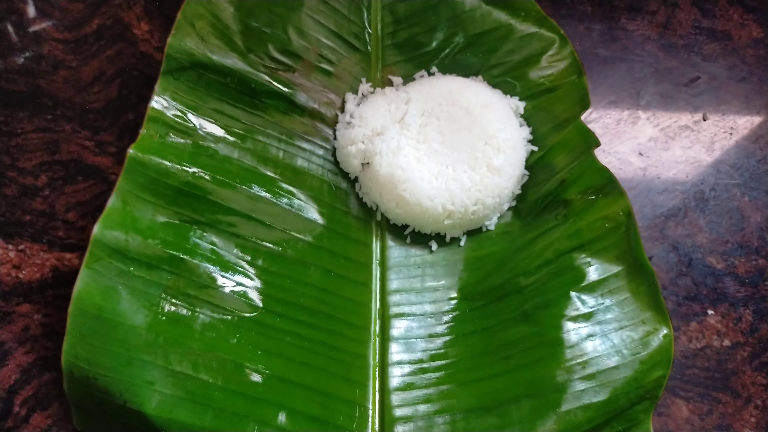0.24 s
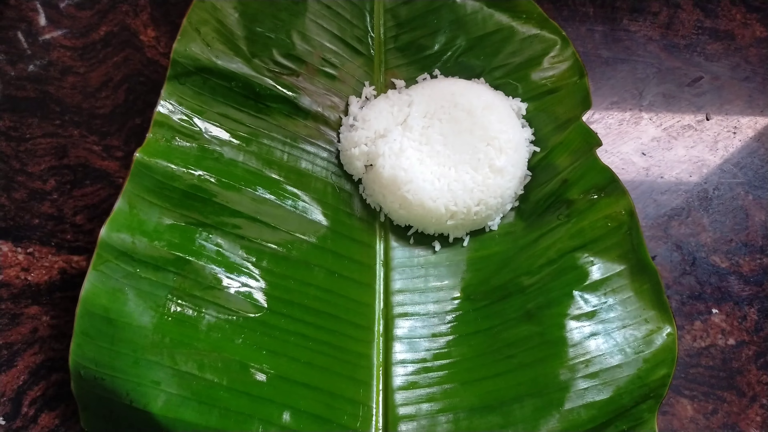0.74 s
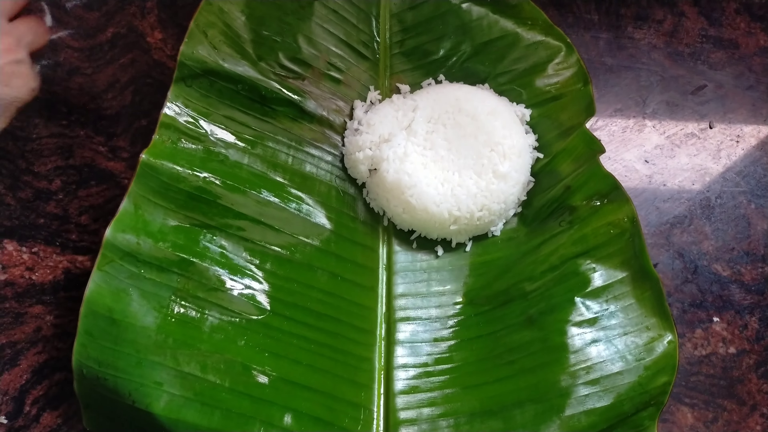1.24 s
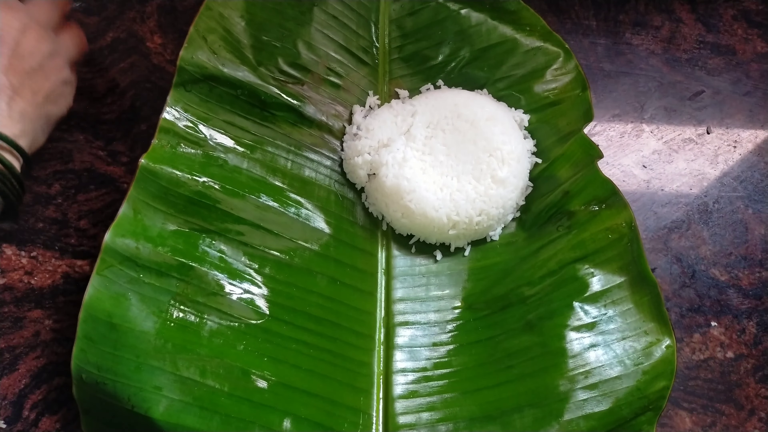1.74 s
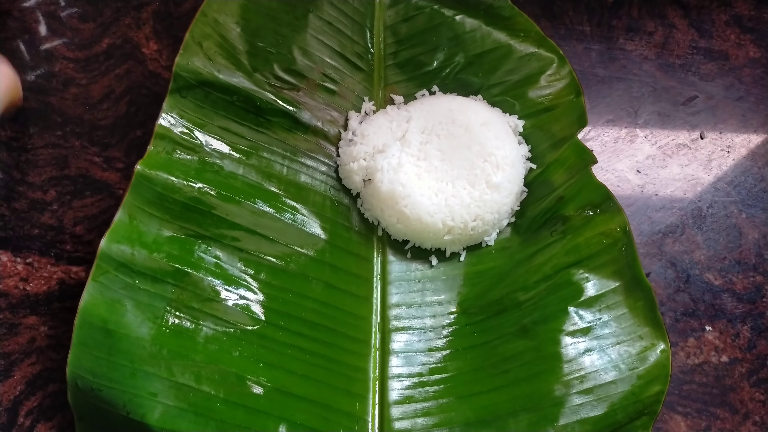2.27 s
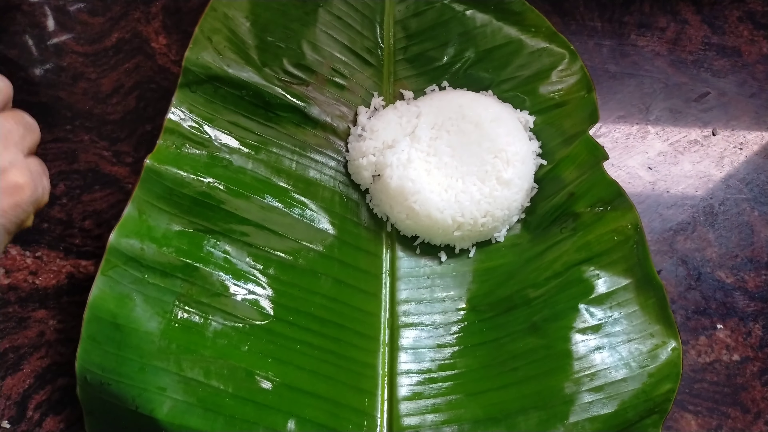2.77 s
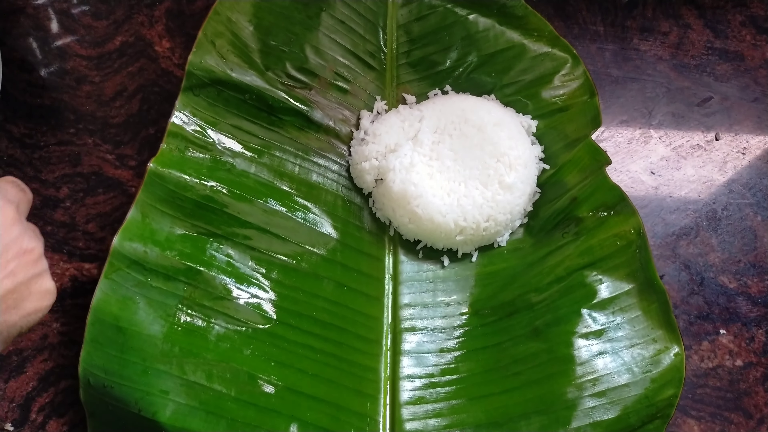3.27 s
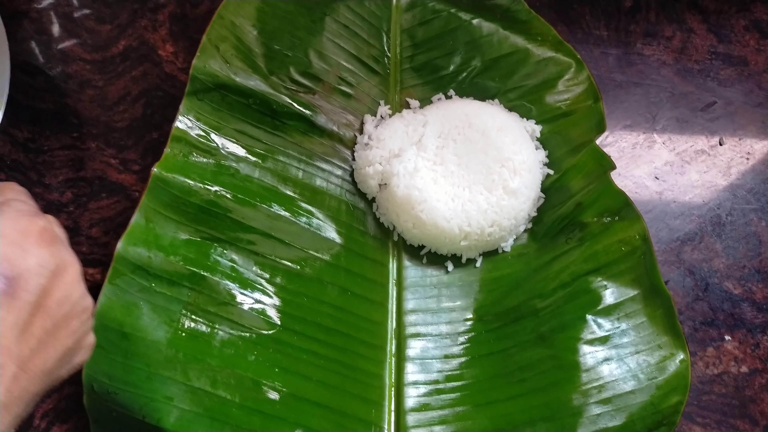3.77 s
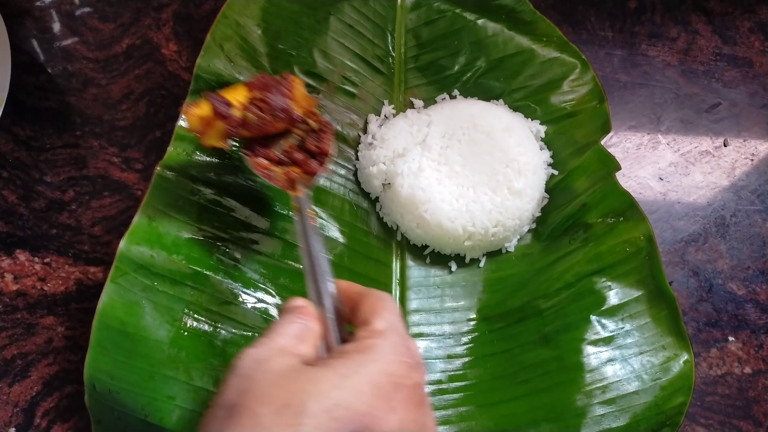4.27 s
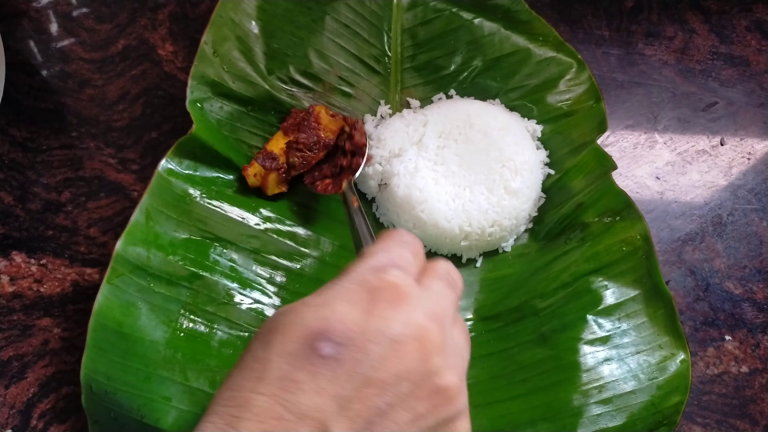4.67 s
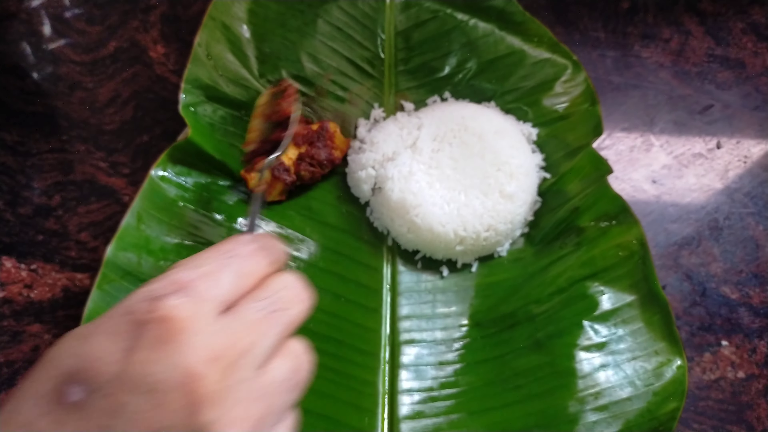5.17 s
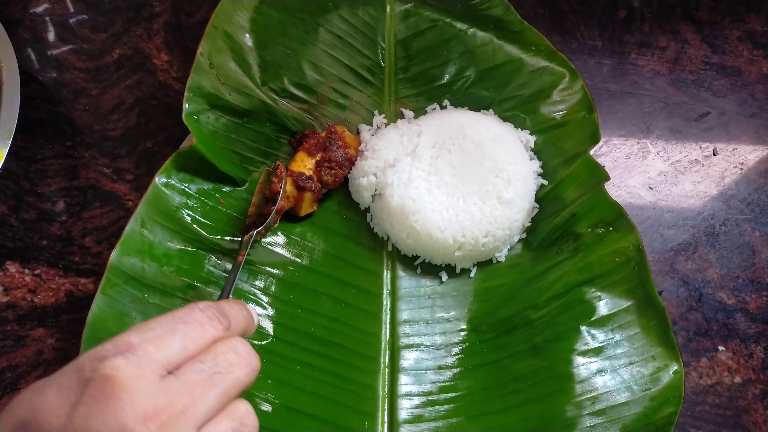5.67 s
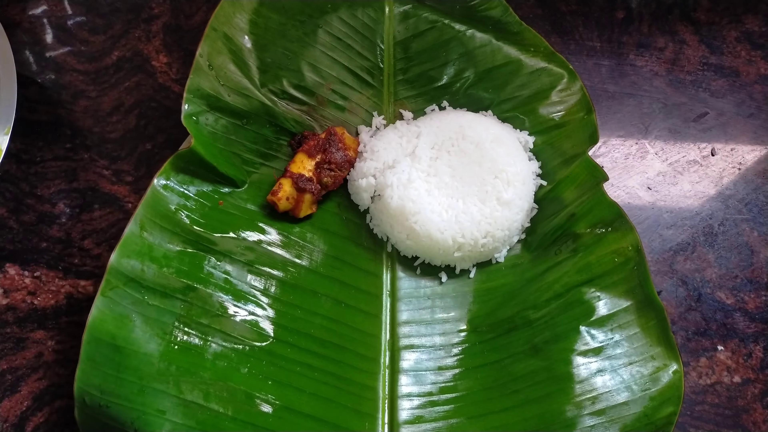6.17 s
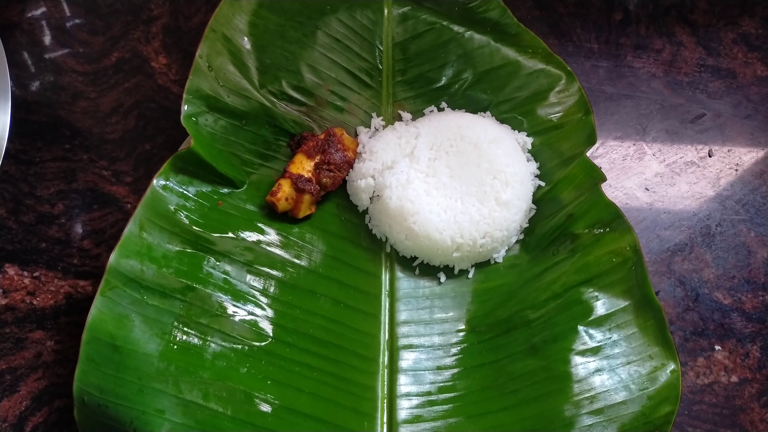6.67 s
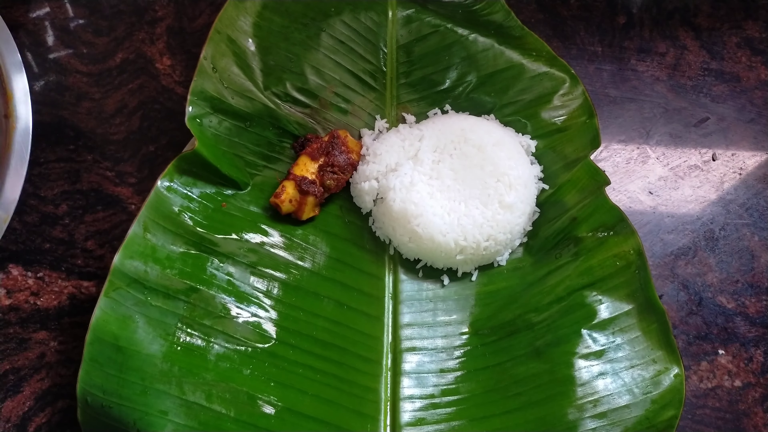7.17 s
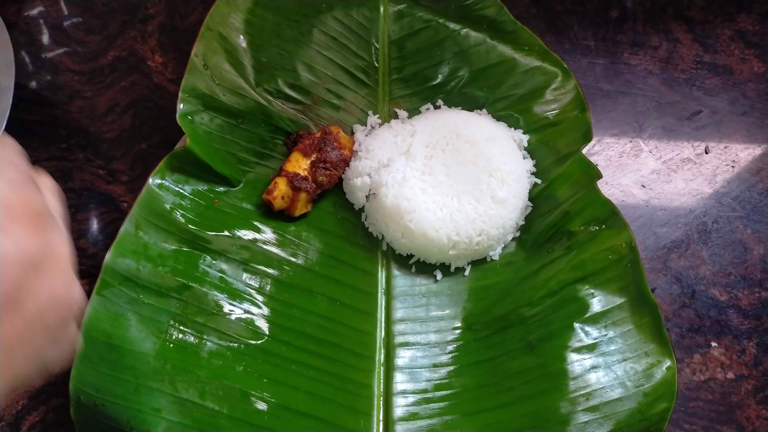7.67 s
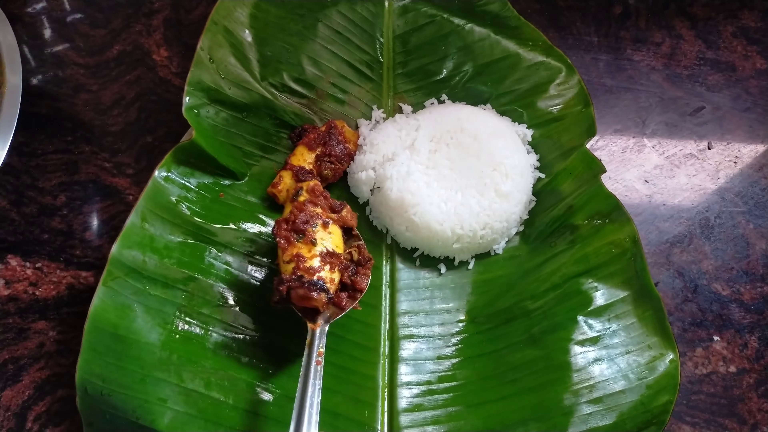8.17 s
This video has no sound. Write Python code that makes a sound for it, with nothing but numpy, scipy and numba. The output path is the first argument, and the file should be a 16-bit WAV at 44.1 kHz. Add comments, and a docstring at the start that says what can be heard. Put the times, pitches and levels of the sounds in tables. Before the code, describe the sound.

Loud metallic cup rattle on a stone top, followed by quieter lid, spoon, pan and bowl clinks, soft leaf brushing and faintly humming kitchen air.

```python
"""Serving food in a home kitchen, a phone close by. Soft brushing starts; a steel cup is set down on stone,
rocks to rest, and bangles tinkle; a lid is dragged aside; a steel spoon taps, then lands on a full steel pan;
a bowl is nudged along. Modal resonance: blows and gritty sliding excite each object's damped modes and clatter.
Shaped noise makes the ticks, the brushing, the small hard room's decay and the steady, faintly humming air."""
import sys
import numpy as np
from scipy import signal
from scipy.fft import rfft, irfft, next_fast_len
from scipy.io import wavfile
from scipy.ndimage import uniform_filter1d
from numba import njit

SR = 44100
rng = np.random.default_rng(int(sys.argv[2]) if len(sys.argv) > 2 else 0)


def pcm_store(signal):
    """Save signal as 16-bit PCM."""
    levels = np.round(np.clip(np.atleast_2d(signal), -1, 1) * 32767)
    wavfile.write(sys.argv[1], SR, levels.astype(np.int16).T)


N = 371983
T = np.arange(N) / SR

# centres of the bands that colour a contact: pitch_hz
CONTACT_BANDS_HZ = [700, 1800, 3000, 5500, 11000]
BANGLE_BANDS_HZ = [6500, 8500, 10500, 12200, 14500]
# pitches of the modes: pitch_hz
CUP_PITCHES_HZ = [305, 478, 1073, 1303, 1380, 1458, 1554, 1657, 1752, 1790, 1849, 2027, 2945, 2990, 3760,
                  4997, 5640, 6313, 7660, 8440, 9930, 10680, 11300, 11860, 12100, 13100, 13600, 14060,
                  14900, 15490]
PAN_PITCHES_HZ = [790, 1073, 1300, 1385, 1530, 1640, 1720, 2185, 2480, 2625, 3170, 3300, 3730, 4390, 5050,
                  5820, 6600, 7410, 8270, 9220, 10300, 10800, 11700, 13100, 14000, 15600]
BOWL_PITCHES_HZ = [1100, 1273, 1310, 1386, 1645, 1710, 1753, 2250, 2518, 3250, 3850, 4400, 5080, 5900, 7330,
                   9090, 10400, 10800, 11700, 12600, 13100, 14000, 14600, 15600]
# damping and strength of those modes: width_hz (before the body's width factor), relative level_db
CUP_DAMPING = [(30, -23.5), (59.8, -55), (150, -14.5), (150, -3.5), (152, -10), (150, -21), (150, -14),
               (100, 1), (60.6, -1), (11, 5.5), (99.4, -29), (150, -15.5), (40, -6), (60, -12.5),
               (140, -28), (35, -24.5), (97, -40), (30, -23.5), (45, -27.5), (51, -23), (63, -35),
               (60, -22), (60, -20.5), (40, -23), (60, -20), (40, -20), (110, -37), (150, -27), (40, -30),
               (76, -16.5)]
PAN_DAMPING = [(40, -5.5), (50, -0.5), (63, 11.5), (60, 6.5), (63.7, 13.5), (60.3, 16), (58, 10.5),
               (37.7, 0.5), (40.7, 3), (50, 2.5), (60.6, -5), (61.4, -6.5), (70, -7.5), (62, -14.5),
               (50, -16.5), (79, -27), (50, -26), (200, -19.5), (120, -25), (140, -19.5), (120, -17),
               (150, -28), (40, -24), (40, -34), (100, -36), (50, -7)]
BOWL_DAMPING = [(33, -21.5), (45, -4), (45, -2.5), (45, -4.5), (45, -8), (45, -2.5), (45, -8), (100, -23),
                (34.7, -8.5), (50, -27), (80, -35), (60, -42), (49.2, -41), (60.6, -48), (54, -46),
                (150, -33), (59, -29), (45, -42), (49, -31), (54.3, -37), (81, -34), (38, -37), (39.6, -31),
                (130, -31)]
# whole modes: pitch_hz, width_hz (before the width factor), relative level_db
LID_MODES = [(940, 29, -20), (1050, 92, -3), (1700, 24, -6), (2020, 120, 10), (2510, 66, 11), (2850, 70, 0),
             (3693, 70, 2.5), (4790, 36, -15.5), (5700, 170, -25), (6600, 64, -21), (7400, 32, -15),
             (7060, 29, -27), (8950, 110, -19), (9500, 13, -7.5), (9040, 100, -19), (10130, 35, -13),
             (9890, 13, -19), (10130, 57, -13), (11100, 31, -8), (11600, 67, -10), (11900, 26, -21),
             (12200, 68, -9), (13200, 130, -9), (13500, 43, -17), (13800, 33, -13), (14600, 64, -11),
             (14800, 170, -12), (15600, 42, -11)]
SPOON_MODES = [(1119, 130, -21), (1468, 39, 9.5), (1886, 61, 14), (2500, 66, 6.5), (2750, 60, -7),
               (3120, 120, -0.5), (3776, 91, 1), (4300, 71, -29), (4450, 37, -24), (4770, 70, -9),
               (5060, 37, -16), (5940, 52, -33), (6220, 56, -27), (7160, 40, -29), (9230, 110, -15),
               (9500, 160, -13), (10200, 91, -15), (10900, 51, -27), (11700, 130, -28), (11500, 29, -20),
               (12050, 160, -11), (13200, 70, -16), (14100, 77, -28), (15400, 72, -16)]
BANGLE_MODES = [(7870, 77, -44), (10040, 12, -7.5), (9460, 19, -17), (10750, 33, -4), (11420, 21, 0),
                (12200, 130, 1), (13300, 32, -8), (13700, 30, -16.5), (14000, 50, -1), (14500, 33, -8),
                (15400, 41, 4), (15400, 140, 7)]
# bodies: width_factor, clatter_db (against the modes), clatter_t60_s, first_crack_db, clatter_treble_db
CUP_SOLID = (0.44, -3, 0.2751, 5, -1)
LID_SOLID = (0.5, 1.1, 0.16, 12, 6.8)
SPOON_SOLID = (0.8, -6, 0.84, 15, 5)
PAN_SOLID = (.5, -11, 0.4255, -5.5, 7)
BOWL_SOLID = (0.54, -13.5, 0.46, -3, 5)
BANGLE_SOLID = (1.5, -6, 1.3, 6, 2)
# what a contact favours: (blow level_db in each of five bands), (sliding middle_db, high_db)
CUP_CONTACT = ((-23.5, -0.5, -15.5, -36, -61), (0, -12))
LID_CONTACT = ((-17, -1.5, -7, -2.5, -15), (4.7, -4.5))
SPOON_CONTACT = ((-24, -13, 0, -7.5, -29), (0, -16))
PAN_CONTACT = ((-12, -2, -7, -28.5, -31), (-9.5, -23))
BOWL_CONTACT = ((-3, -3.5, -29, -35, -30), (-7.5, -28.5))
BANGLE_CONTACT = ((-29, -6, 10, -4, 7), (0, 2))
# blows: start_s, level_db (before the contact's colour), hardness_db_per_octave (away from the second band),
# surviving_share (of the earlier ringing, 0 to 1)
CUP_STRIKES = [(0.359, -10, 2, 0.23), (0.392, -10, -27, 0.14), (0.411, -13, 1.5, 0.49),
               (0.441, -9, -17, 0.89), (0.477, -9.5, -23, 0.48), (0.514, -21, -12, 0.26),
               (0.528, -17, -2, 0.53), (0.581, -29, 4.5, 0.28), (0.612, -23, -7, 0.54),
               (0.65, -11.5, 5.5, 0.34), (0.676, -13.5, 3, 0.61), (0.717, -15.5, 6, 0.5),
               (0.74, -22, 0, 0.76), (0.773, -18.5, 4, 0.59), (0.807, -18, 3, 0.58), (0.844, -32, -7, 0.12),
               (0.91, -29.5, -4, 0.16), (0.966, -38.5, -12, 0.4)]
LID_STRIKES = [(1.446, -61, 4.5, 0.8), (1.528, -39, 0.5, 0.6), (1.571, -22, -7.5, 1),
               (1.6, -33.5, -1.5, 0.48), (1.69, -27.5, -1.5, 0.8), (1.71, -33, -1.5, 0.74),
               (1.902, -55, 4, 0.98)]
SPOON_STRIKES = [(2.408, -46, -1.4, 0.92), (2.45, -70, 0, 0.77), (2.511, -64, 1.8, 1),
                 (2.763, -28, 0.73, 1), (2.83, -47, 0, 0.46), (2.919, -55, 1, 0.99), (2.987, -69, 1, 0.8)]
PAN_STRIKES = [(3.18, -48.5, -5, 0.8), (3.31, -27.5, 1, 0.94), (3.416, -65, 10, 0.49),
               (4.143, -23.5, 4.5, 0.73), (4.158, -35, 2, 0.8), (5.932, -56, 3, 0.64),
               (6.043, -29.5, -0.5, 0.32), (6.076, -35, 3.5, 0.35), (6.117, -69, -4, 0.8),
               (6.849, -21.5, 4.5, 0.8), (6.874, -27.5, 3.5, 0.28), (6.884, -26, 0.5, 0.12),
               (6.936, -36, 0, 0.89)]
BOWL_STRIKES = [(6.3004, -45, 1.5, 1), (6.3662, -50, 5, 0.95), (6.4082, -68, 2, 0.66),
                (6.428, -61, 6.5, 0.77), (7.086, -56, -4, 1), (7.143, -34.5, -2, 0.96),
                (7.191, -41.5, -2, 0.77), (7.3203, -54, 3, 0.59)]
BANGLE_STRIKES = [(0.576, -58.5, 5, 0.9), (0.8376, -52, -4, 0.9), (0.9073, -58, -2, 0.75),
                  (0.9926, -68, 8, 0.71), (1.0264, -73, 2, 0.84), (2.5137, -65, 3, 0.9),
                  (3.067, -67, -8, 0.9), (6.0146, -78, 2, 0.9), (6.8099, -90, 8, 0.77),
                  (7.5127, -87, 0, 0.9)]
# slides, each a list of breakpoints: time_s, level_db, brightness_db_per_step (low to middle to high bands)
CUP_SLIDES = [
    [(0.36, -15, -14), (0.37, -32.5, -3), (0.5, -31.5, -4), (0.525, -33, -3), (0.59, -40, -2.5),
     (0.642, -49, -3.5), (0.65, -25, -1), (0.668, -32.5, 3), (0.832, -33.5, -1), (0.884, -57, 2),
     (1.12, -63, -5)],
]
LID_SLIDES = [
    [(1.42, -80, 3), (1.446, -52, -3.5), (1.5, -58, 1), (1.536, -47, 2), (1.572, -35, -1.5),
     (1.612, -39.5, 2), (1.68, -45.5, -0.5)],
    [(1.694, -48, 6.5), (1.758, -49.5, 6.5), (1.86, -57, 3), (1.978, -57, 0), (2.058, -53.5, 3.5),
     (2.1, -58, 1), (2.2, -67, -4)],
]
SPOON_SLIDES = [
    [(2.398, -80, -5), (2.408, -50, 5.5), (2.478, -50.5, -3.5), (2.512, -57.5, 6), (2.62, -92, -4)],
    [(2.78, -44.5, 2.9), (2.862, -55.5, -1.2), (2.982, -79, 2), (3.04, -62.5, 2.3)],
]
PAN_SLIDES = [
    [(3.38, -53, 0), (3.422, -49, 2), (3.52, -60, 0)],
]
BOWL_SLIDES = [
    [(6.28, -70, -10), (6.306, -51, 1), (6.336, -56, 3), (6.412, -40.5, 0), (6.486, -67, 8),
     (6.56, -79, 15)],
    [(7.04, -64, 4), (7.13, -44, -1), (7.15, -57, -3), (7.172, -57, 4), (7.262, -58.5, 4),
     (7.316, -46.5, -1), (7.398, -60.5, 4), (7.48, -66, 3)],
]
BANGLE_SLIDES = [
    [(0.986, -80, 7), (0.994, -65, -0.5), (1.12, -85, 3)],
    [(7.5, -92, 0), (7.514, -79, 0), (7.542, -76, 2), (7.63, -91, 0)],
]
# the cup once it sits flat: start_s, added width_hz
CUP_AT_REST = (.85, 28)
# dense clatter between the modes: pitch_hz, relative density_db_per_hz
CLATTER_SPECTRUM = [(88, -78), (150, -40.5), (303, -19), (578, -18), (1190, -9), (1760, 2.5), (2270, -15),
                    (3040, -15.5), (4320, -45), (6140, -46.5), (6910, -74), (8560, -35.5), (16000, -52)]
# dry ticks: start_s, peak_db, pitch_hz
TICK_EVENTS = [(.080, -49, 9200), (0.093, -47, 10000), (1.267, -47, 2180), (4.05, -55, 2600),
               (4.679, -50, 2760), (5.1, -42, 1800), (5.451, -39, 2000), (5.599, -37.5, 1630),
               (5.944, -56, 9050), (7.102, -51, 7270), (7.557, -43, 1600), (7.568, -37, 1500),
               (7.769, -36, 1790), (7.848, -43, 2100), (8.000, -48, 2230), (8.257, -45, 2300)]
# hand, spoon and food brushing a leaf: start_s, level_db, t60_s
RUSTLE_STROKES = [(0.03, -51.5, 1.2), (1.14, -63, .3), (1.264, -69, 0.69), (3.5, -48, 0.17),
                  (4.04, -45, 0.13), (4.405, -58.5, 0.64), (4.68, -51, 0.26), (4.868, -61, 1),
                  (5.09, -48, 0.25), (5.294, -67, .1), (5.356, -55.5, 1.8), (5.6, -69, 0.32),
                  (5.934, -46, 0.46), (6.694, -61, 1), (7.55, -58, 0.54), (7.74, -54, 0.57),
                  (8, -45, 0.067), (8.254, -50, 0.25)]
# brushing noise: pitch_hz, relative density_db_per_hz
RUSTLE_SPECTRUM = [(700, -8), (1500, 4.5), (2400, 10), (3300, -18), (4500, -19), (9000, -37.5),
                   (15000, -40)]
# murmur of the air: pitch_hz, relative density_db_per_hz
AIR_SPECTRUM = [(21, -61), (35, -96), (95, 2), (163, 0.5), (195, -5), (222, 4), (317, 3.5), (431, 0),
                (466, 2), (884, -2), (2220, -2.5), (3440, -23.5), (6520, -41.5), (8870, -28), (16000, -41)]
# course of the murmur: time_s, level_db (before the lifts), treble_lift_db, bass_lift_db
AIR_COURSE = [(0, -48, 12, -3), (.35, -50, 5.5, 4), (1.15, -52, 5, 6), (1.7, -50, 6, 4.5),
              (2.3, -52, 2.5, 3.5), (3.0, -50.5, 2.5, -3), (4.85, -51.5, 2.5, 1), (5.7, -50.5, 2.5, -1),
              (6.7, -51, 2.5, 1), (7.5, -50, 2.5, -0.5), (8.43, -54.5, 4, -2)]
# hum within the air: pitch_hz, level_db (centres of a slow wander)
HUM_TONES = [(231.5, -71.5), (312.2, -63.5), (473.7, -71.5)]

CHOKE_SAMPLES, TREBLE_CHOKE = 48, 0.61  # duration of a contact; share of its choking above 4000 Hz
CHATTER_T60_S, CRACK_T60_S = 0.046, 0.03
LID_GRIP_HZ = 25  # width that the holding hand adds to the lower modes; TREBLE_CHOKE scales it above 4000 Hz
TICK_T60_S, TICK_CYCLES, TICK_ATTACK_S = 0.006, 23, 0.0022
RUSTLE_ATTACK_S, RUSTLE_BED_DB, RUSTLE_WAVER_DB = 0.009, -65.5, 4
BASS_HZ, TOP_HZ = 246, 15900
ROOM_T60_S, ROOM_DB, ROOM_DULL_HZ = 0.51, -15, 5760


def cup():
    """Modal resonance with added damping: a rocking cup rings until it sits flat."""
    modes = np.c_[CUP_PITCHES_HZ, CUP_DAMPING]
    return steel(modes, CUP_SOLID, CUP_CONTACT, CUP_STRIKES, CUP_SLIDES, grit_db=2.5, rest=CUP_AT_REST)


def lid():
    """Contact damping: the holding hand broadens the modes of the dragged lid throughout."""
    return steel(LID_MODES, LID_SOLID, LID_CONTACT, LID_STRIKES, LID_SLIDES,
                 grit_db=2.0, rest=(0, LID_GRIP_HZ))


def spoon():
    """Impact excitation: taps and short slides set the spoon's modes ringing."""
    return steel(SPOON_MODES, SPOON_SOLID, SPOON_CONTACT, SPOON_STRIKES, SPOON_SLIDES, grit_db=-3.0)


def pan():
    """Impact excitation of damped modes: the pan full of food answers the spoon."""
    modes = np.c_[PAN_PITCHES_HZ, PAN_DAMPING]
    return steel(modes, PAN_SOLID, PAN_CONTACT, PAN_STRIKES, PAN_SLIDES, grit_db=-6.0)


def bowl():
    """Friction excitation: a nudged bowl is driven by slides as well as blows."""
    modes = np.c_[BOWL_PITCHES_HZ, BOWL_DAMPING]
    return steel(modes, BOWL_SOLID, BOWL_CONTACT, BOWL_STRIKES, BOWL_SLIDES, grit_db=0.0)


def bangles():
    """High modal resonance: faint chattering contacts make the bangles tinkle."""
    return steel(BANGLE_MODES, BANGLE_SOLID, BANGLE_CONTACT, BANGLE_STRIKES, BANGLE_SLIDES,
                 grit_db=-1.5, bands_hz=BANGLE_BANDS_HZ)


def steel(modes, body, touch, blows, rubs, grit_db, bands_hz=CONTACT_BANDS_HZ, rest=(9, 0)):
    """Modal superposition: blows and gritty sliding drive an object's modes and its clatter."""
    hz, width, db = np.transpose(modes)
    width_factor, clatter_db, clatter_t60, crack_db, treble_db = body
    poles = np.exp((2j * np.pi * hz - np.pi * width * width_factor) / SR)
    # neighbouring modes start in opposite senses
    gains = undb(db) * np.sqrt(width) * (-1.0) ** np.arange(len(hz))
    choke = np.where(hz > 4000, TREBLE_CHOKE, 1.0)

    # the object's answer to a single click
    click = np.zeros(SR // 2)
    click[0] = 1
    tone = ring(click, 0 * click, poles, gains, choke)
    head = SR // 100  # levels are matched over the first 10 ms
    spectrum = [(f, d + treble_db * (f > 4000)) for f, d in CLATTER_SPECTRUM]
    clatter = tail(spectrum, clatter_t60, crack_db)
    clatter *= undb(clatter_db) * np.std(tone[:head]) / np.std(clatter[:head])

    start_s, blow_db, hardness, survives = np.transpose(blows)
    at = (start_s * SR).astype(int)
    loss = np.zeros(N)
    choked = at[:, None] - np.arange(CHOKE_SAMPLES)
    loss[choked] = 1 - np.clip(survives[:, None], 0.01, 1) ** (1 / CHOKE_SAMPLES)
    rest_s, rest_width_hz = rest
    loss[int(rest_s * SR):] += np.pi * rest_width_hz / SR

    grit = gritty(grit_db)
    fall = np.exp(-np.log(1000) / CHATTER_T60_S / SR)
    blow_touch_db, slide_touch_db = touch
    drive = np.full(N, 1e-18)  # keeps the silent resonators numerically fast
    for k, only in enumerate(np.eye(len(bands_hz))):
        answer = shape(tone + clatter, bands_hz, only)
        octaves = abs(np.log2(bands_hz[k] / bands_hz[1]))
        force = np.zeros(N)
        force[at] = undb(blow_db + blow_touch_db[k] + hardness * octaves) / np.std(answer[:head])
        if bands_hz[k] > 4000:  # the treble comes from a brief chatter, not from one clean push
            force = grit * signal.lfilter([np.sqrt(1 - fall ** 2)], [1, -fall], force)
        step = (0, 0, 1, 2, 2)[k]  # low, middle or high
        for rub in rubs:
            time_s, rub_db, bright_db = np.transpose(rub)
            slide_db = rub_db + step * bright_db + np.r_[0, slide_touch_db][step]
            level = undb(np.interp(T, time_s, slide_db, left=-200, right=-200))
            force += grit * level / np.sqrt(np.sum(answer ** 2))
        drive += shape(force, bands_hz, only)
    return ring(drive, loss, poles, gains, choke) + signal.fftconvolve(drive, clatter)[:N]


@njit
def ring(drive, loss, poles, gains, choke):
    """Damped harmonic oscillators in parallel; contact loss drains what is still ringing."""
    out = np.zeros(len(drive))
    for p, g, c in zip(poles, gains, choke):
        z = 0j
        for i in range(len(drive)):
            z = z * p * (1 - c * loss[i]) + drive[i]
            out[i] += g * z.imag
    return out


def gritty(grit_db):
    """Granular roughness: noise whose grains vary randomly in size, rms 1."""
    x = rng.standard_normal(N) * undb(grit_db * np.minimum(rng.exponential(size=N), 5))
    return x / x.std()


def tail(spectrum, t60_s, crack_db=-60):
    """Exponential decay: coloured noise dies away after a sharper start, at unit energy."""
    t = np.arange(SR // 2) / SR
    slow = np.exp(-np.log(1000) * t / t60_s)
    crack = undb(crack_db) * np.exp(-np.log(1000) * t / CRACK_T60_S)
    x = colour(rng.standard_normal(len(t)), spectrum) * (slow + crack)
    return x / np.sqrt(np.sum(x ** 2))


def ticks():
    """Band-limited impulses: small dry contacts, the lower ones decaying more slowly."""
    out = np.zeros(N + SR // 2)
    for s, db, hz in TICK_EVENTS:
        spectrum = [(hz / 3, -35), (hz, 0), (hz * 1.4, -15), (hz * 2, -26), (hz * 4, -60)]
        burst = tail(spectrum, TICK_T60_S + TICK_CYCLES / hz)
        burst = burst * np.minimum(T[:len(burst)] / TICK_ATTACK_S, 1)
        out[int(s * SR):][:len(burst)] += undb(db) * burst / np.abs(burst).max()
    return out[:N]


def rustle():
    """Granular friction: a faint uneven bed and brushing strokes that swell quickly and fade."""
    x = colour(gritty(grit_db=7.5), RUSTLE_SPECTRUM)
    level = undb(RUSTLE_BED_DB + RUSTLE_WAVER_DB * walk(4))
    for s, db, t60_s in RUSTLE_STROKES:
        since = np.maximum(T - s, 0)
        level = level + undb(db - 60 * since / t60_s) * np.minimum(since / RUSTLE_ATTACK_S, 1)
    return x / x.std() * level


def room(near):
    """Diffuse reverberation: a decaying noise response follows the direct sound after 5 ms."""
    response = tail([(ROOM_DULL_HZ / 2, 0), (ROOM_DULL_HZ * 2, -6)], ROOM_T60_S)
    walls = np.r_[np.zeros(SR // 200), response]
    return undb(ROOM_DB) * signal.fftconvolve(near, walls)[:N]


def air():
    """Broadband noise: half-octave bands swell together and flicker alone, with a wavering hum."""
    time_s, db, treble_db, bass_db = np.transpose(AIR_COURSE)
    noise = colour(rng.standard_normal(N), AIR_SPECTRUM)
    noise /= noise.std()
    treble_lift, bass_lift = np.interp(T, time_s, treble_db), np.interp(T, time_s, bass_db)
    centres = 40 * 2 ** np.arange(0, 9, 0.5)
    swell, murmur = walk(1.48), 0
    for hz, only in zip(centres, np.eye(len(centres))):
        lift = treble_lift * (hz > 3500) + bass_lift * (hz < 130)
        murmur = murmur + shape(noise, centres, only) * undb(0.089 * swell + 1.4 * walk(5) + lift)
    hum = 0
    for hz, hum_db in HUM_TONES:
        level = undb(hum_db + 0.83 * walk(5.5))
        phase = 2 * np.pi * np.cumsum(hz * (1 + 0.0104 * walk(5.4))) / SR
        hum = hum + level * np.sin(phase)
    return murmur * undb(np.interp(T, time_s, db)) + hum


def walk(rate):
    """Smoothed random modulation: new values at this rate per second, spread 1."""
    k = int(SR / rate)
    x = uniform_filter1d(np.repeat(rng.standard_normal(N // k + 1), k), k)[:N]
    return x / x.std()


def colour(x, spectrum):
    """Spectral shaping: give flat noise a spectrum of pitch_hz, density_db_per_hz."""
    hz, db = np.transpose(spectrum)
    fine = np.geomspace(hz[0], hz[-1], num=200)
    return shape(x, fine, undb(np.interp(np.log(fine), np.log(hz), db)))


def shape(x, hz, gain):
    """Linear filtering by gains given at points of a log-frequency axis."""
    size = next_fast_len(len(x))
    f = np.maximum(np.arange(size // 2 + 1) * SR / size, 1)
    return irfft(rfft(x, size) * np.interp(np.log(f), np.log(hz), gain), size)[:len(x)]


def undb(db):
    """Logarithmic level: decibels to amplitude gain."""
    return 10 ** (np.asarray(db) / 20)


def scene():
    """Superposition: the near sounds, their reverberation and the air behind."""
    near = cup() + lid() + spoon() + pan() + bowl() + bangles() + ticks() + rustle()
    # the near sounds carry no deep bass
    near = signal.sosfilt(signal.butter(4, BASS_HZ, "high", fs=SR, output="sos"), near)
    return (near + room(near) + air())[None]


def record(dry):
    """Saturation and band limiting: the phone clips at full scale and cuts the top."""
    return signal.sosfilt(signal.ellip(10, 0.2, 70, TOP_HZ, fs=SR, output="sos"), np.clip(dry, -1, 1))


dry = scene()
out = record(dry)
pcm_store(out)
```